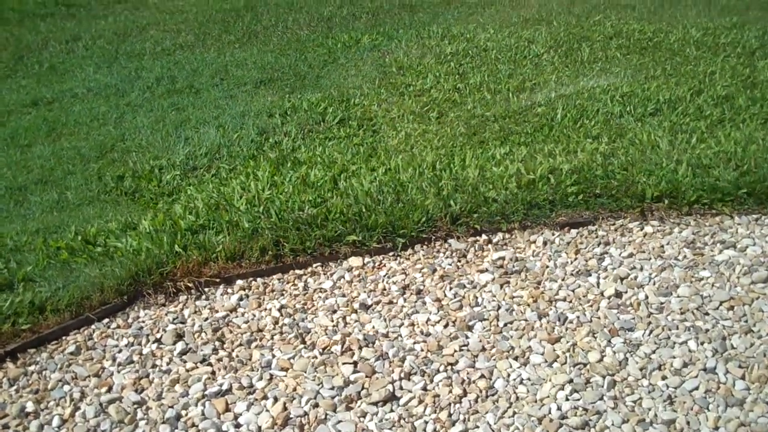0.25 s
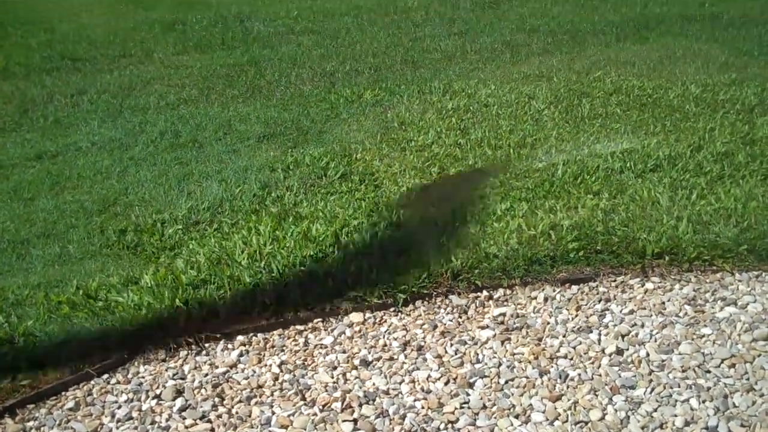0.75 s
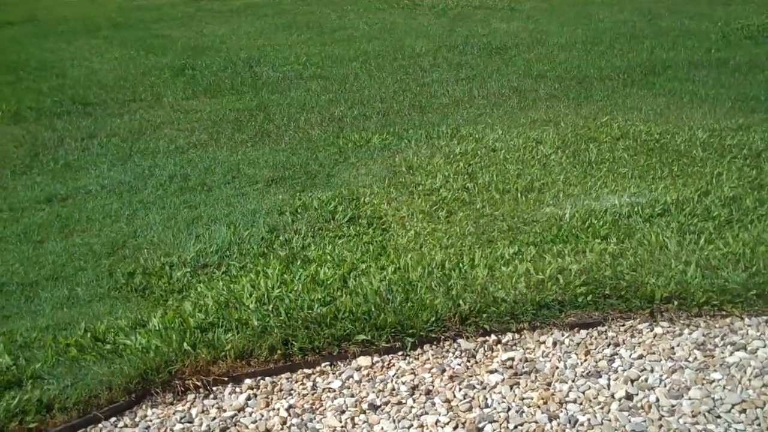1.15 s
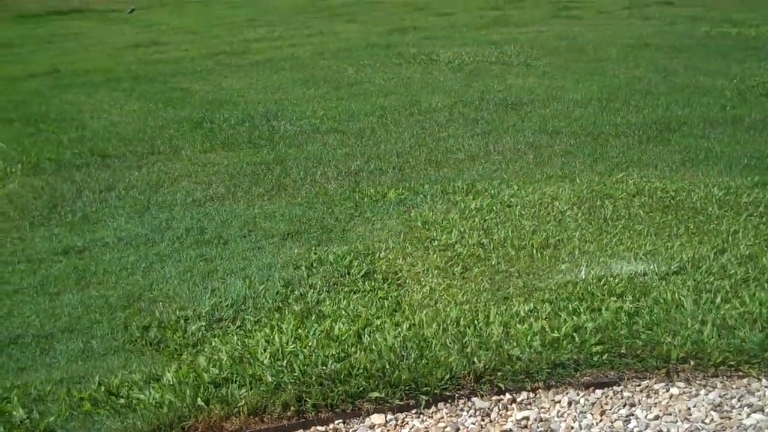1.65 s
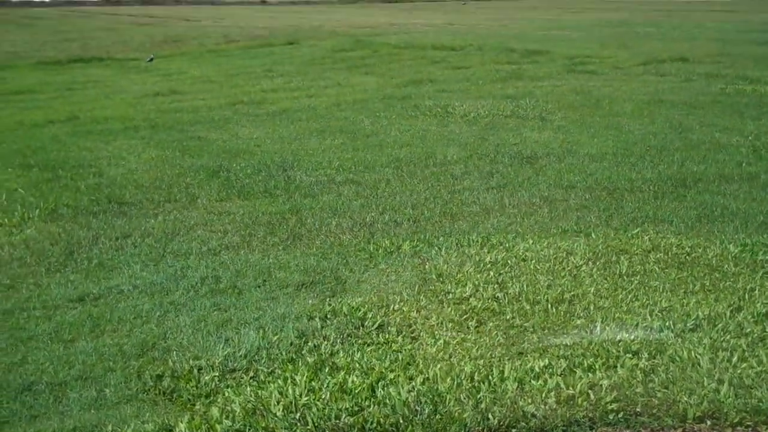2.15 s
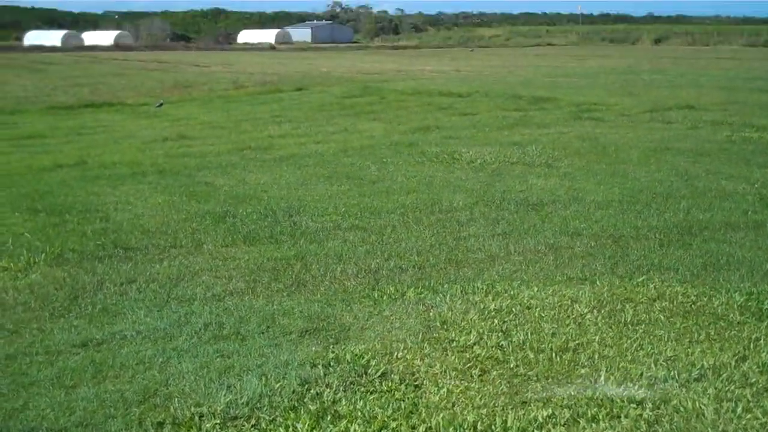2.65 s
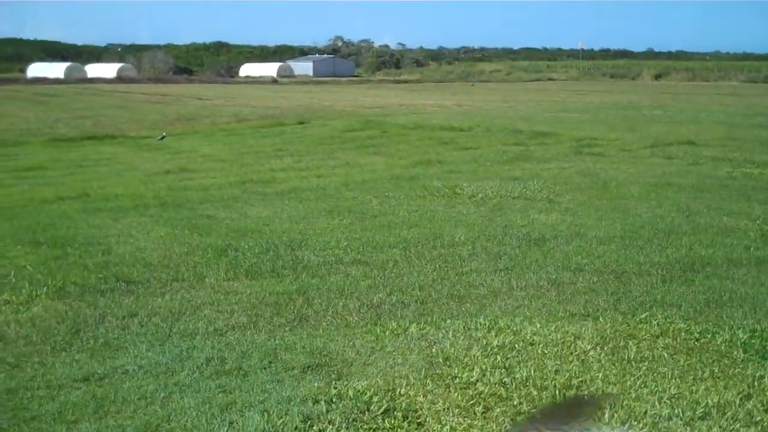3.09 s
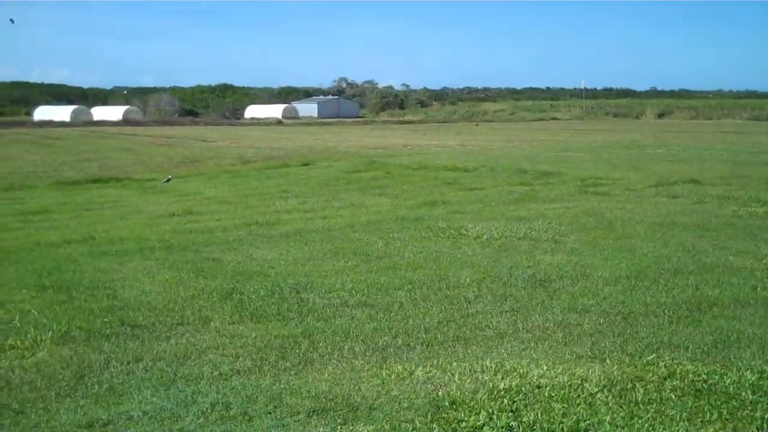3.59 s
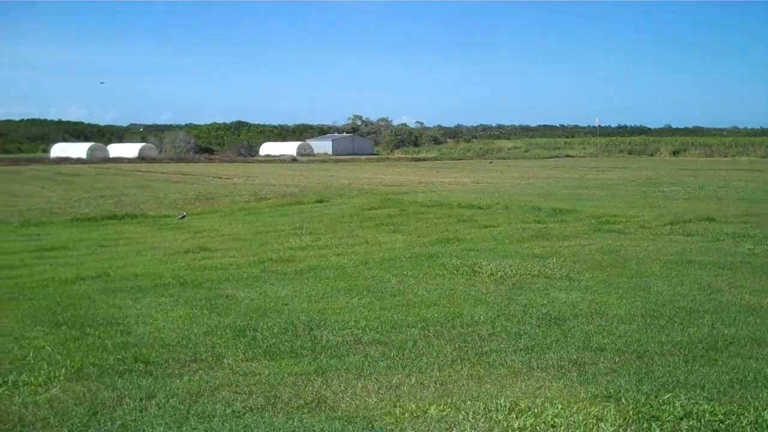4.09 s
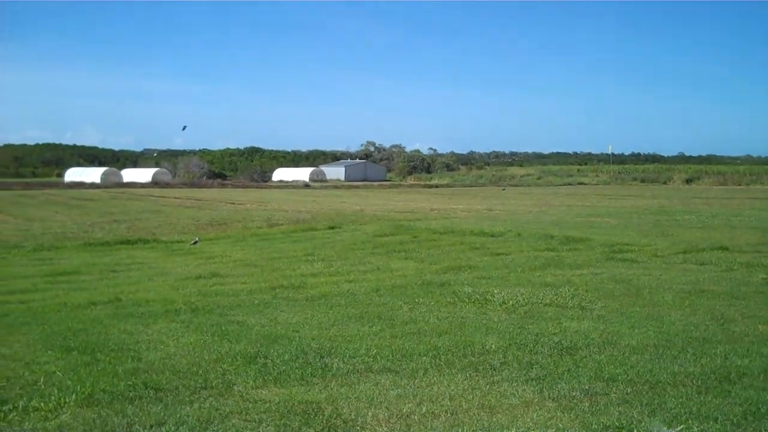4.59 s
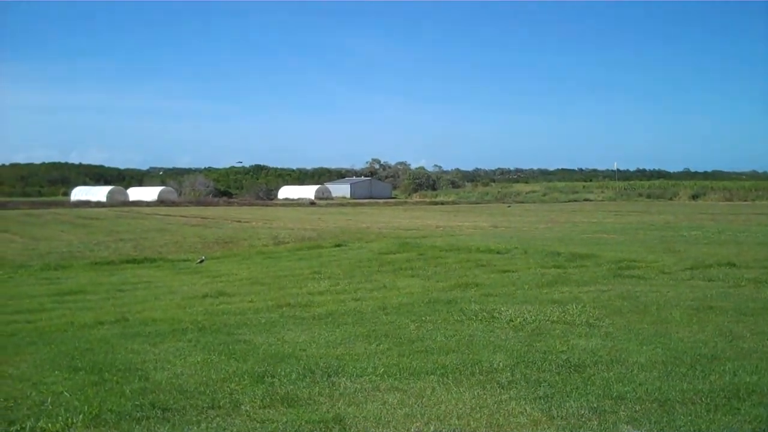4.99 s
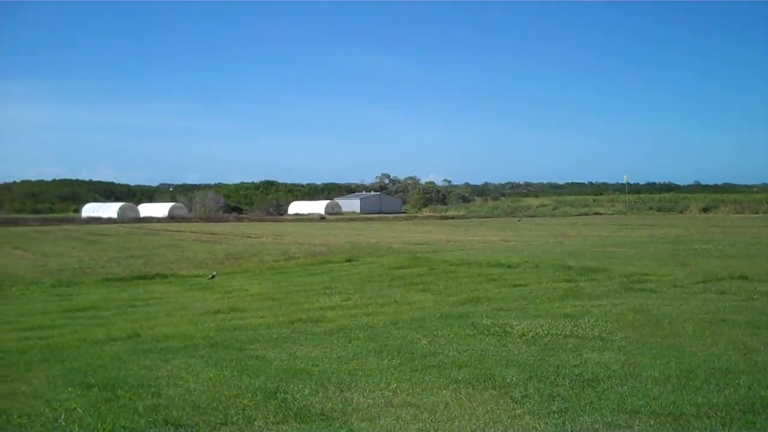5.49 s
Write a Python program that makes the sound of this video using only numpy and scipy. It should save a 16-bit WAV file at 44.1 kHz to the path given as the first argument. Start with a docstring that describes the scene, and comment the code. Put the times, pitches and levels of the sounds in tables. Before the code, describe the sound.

A light piston helicopter flies low over a grassy airfield. It approaches with a loud, low engine drone, a buzzing tail rotor and a soft throb and thin swish from the main blades. As it turns side-on, the exhaust rasp surges about three times a second. It then heads away with more rasp and rushing air, its pitch slowly sinking. A small stereo camera microphone hears it from the ground.

```python
"""A light piston helicopter flies low over an airfield, heard by a small stereo camera in the grass.
It comes in on a six-cylinder exhaust drone and rasp, with a fan note and a buzzing tail rotor; each
main blade makes the drone throb and ends in a thin swish. Just after 1 s the level dips briefly.
From 2 s it turns side-on: the rasp surges about three times a second and the drone gives way each time.
After 4 s it heads away with more rasp and rushing air, its pitch still slowly sinking."""
import sys
import numpy as np
from scipy.fft import rfft, irfft, next_fast_len
from scipy.io import wavfile
from scipy.ndimage import uniform_filter1d, map_coordinates

SR = 44100
rng = np.random.default_rng(int(sys.argv[2]) if len(sys.argv) > 2 else 0)


def inscribe(sig):
    """Save sig as 16-bit PCM at rate SR to the path in sys.argv[1].

    A 1-D sig is mono; a 2-D sig holds one channel per row.
    Samples are clipped to [-1, 1] before scaling.
    """
    pcm = np.round(np.clip(np.atleast_2d(sig).T, -1, 1) * 32767)
    wavfile.write(sys.argv[1], SR, pcm.astype(np.int16))


N = 253134
COMING, SIDE_ON, GOING = VIEWS = (0, 1, 2)  # how the craft faces the listener


# The body of the drone, thinning as the craft swings round: t/s, firing level/dB, octave level/dB
DRONE_FADERS = [(0, -10, -38.5), (2.15, -10, -31), (2.6, -12, -23.5), (3.05, -12, -22.5),
                (3.55, -14, -27.5), (3.9, -22.5, -31.5), (4.15, -32, -30), (4.55, -20.5, -21.5),
                (4.9, -25.5, -30), (5.2, -17.5, -29), (5.74, -15.5, -32)]
# Lesser engine tones: multiple of crank rate, coming level/dB, side-on level/dB, going level/dB
ENGINE_PARTIALS = [(1, -43, -36.5, -30), (2, -34.5, -31, -43.5), (2.5, -43, -49, -30),
                   (3.5, -50.5, -36, -26.5), (4, -38, -36, -53.5), (4.5, -45, -38, -24),
                   (5, -35.5, -50, -37.5), (5.5, -49.5, -52.5, -42), (6.5, -46.5, -44.5, -43),
                   (7, -36.5, -39.5, -29.5), (7.5, -55.5, -42, -36.5), (8, -52.5, -40, -46),
                   (8.5, -39.5, -55, -35), (9, -44, -40, -29), (10, -46.5, -59, -52),
                   (11.5, -51, -45.5, -43.5), (12, -53.5, -58, -48.5), (12.5, -52.5, -57.5, -51.5)]

def exhaust_drone(turns, blade, view, throb, surge_db):
    """Three firings a turn make the drone; unequal cylinders add half-orders around it."""
    firing_db, octave_db = curves(DRONE_FADERS)
    firing_db = firing_db - 0.44 * surge_db  # ducks under each surge
    firing = amp(firing_db) * tone(3 * turns, flutter_db=0.82, drift=0.086, rate=12)
    octave = amp(octave_db) * tone(6 * turns, flutter_db=2.5, drift=0.19, rate=11)
    lesser = 0
    for order, *levels in ENGINE_PARTIALS:
        gain = amp(np.interp(view, VIEWS, levels) - 1)
        lesser += gain * tone(order * turns, flutter_db=2, drift=0.28, rate=3.976)
    # each blade pushes its downwash over the pipe
    return firing * tremolo(blade, throb, at=.5) + (octave + lesser) * tremolo(blade, throb / 2, at=.3)


def exhaust_buzz(turns, view):
    """The engine cycle repeats every two turns: two wavetables of it, blended by the sound path."""
    harmonic = np.arange(4097)
    in_range = (harmonic > 19) & (harmonic < 150)
    strength = in_range * np.where(harmonic % 2, .6, 1)  # half-orders are the weaker ones
    partials = rng.standard_normal((2, 4097, 2)) @ [1, 1j]
    waves = irfft(partials * strength)
    first, second = [np.interp(turns / 2 % 1, np.linspace(0, 1, len(wave)), wave) for wave in waves]
    path = view + 0.66 * wobble(2.998)
    return np.cos(path) * first + np.sin(path) * second


# EQ of the rasp: f/Hz, coming level/dB, side-on level/dB, going level/dB
RASP_EQ = [(90, -27.5, -23.5, -21.5), (164, 3, -2.5, -0.5), (230, -2.5, -0.5, 0.5), (304, -4, 0, -3),
           (370, -7.5, -4.5, -5.5), (470, -14, -10.5, -10.5), (551, -11.5, -11.5, -12),
           (710, -16, -13, -13), (900, -21.5, -19, -19), (1100, -23.5, -20.5, -20),
           (1390, -28.5, -27.5, -26.5), (1800, -37, -33.5, -32.5), (2190, -46, -43, -47),
           (7000, -73.5, -73, -68)]

def exhaust_rasp(turns, blade, view, level_db):
    """Puffs of gas at each firing over the pitched buzz, crossfaded between the three views."""
    buzz = exhaust_buzz(turns, view)
    rasp = 0
    for facing in VIEWS:
        eq = [(hz, levels[facing]) for hz, *levels in RASP_EQ]
        share = np.clip(1 - np.abs(view - facing), 0, 1)
        puffs = noise(eq) * tremolo(3 * turns, .2, at=0)
        pitched = filtered(buzz, lambda hz: colour(eq, hz))
        rasp += amp(-2.5) * np.sqrt(share) * puffs / midrange_rms(puffs)
        rasp += amp(-3.5) * share * pitched / midrange_rms(pitched)
    # the harder the rasp, the sharper its edge; duller from behind
    edge_eq = [(1200, -27.5), (1850, 4.5), (2800, 4.5), (5000, -16.5)]
    edge = filtered(rasp, lambda hz: amp(along(edge_eq, hz)))
    edge_db = np.interp(level_db, [-35, -29.5], [-18, -2]) + np.interp(view, [SIDE_ON, GOING], [0, -8])
    chop = tremolo(blade, 0.073, at=0.44) * tremolo(2 * blade, 0.048, at=0.15)
    return amp(level_db) * (rasp + amp(edge_db) * edge) * chop


# Swells during the turn: crest t/s, half-length/s, boost/dB
RASP_SWELLS = [(2.104, .06, 2.5), (2.424, 0.11, 5), (2.764, .09, 5.5), (3.055, .06, 6), (3.36, 0.051, 6),
               (3.647, .07, 2), (3.897, 0.045, 4.5), (4.156, .08, 2.5), (4.579, .12, 3.5)]

def rasp_surges():
    """The rasp's boost in dB as the craft turns: bell-shaped swells, slightly flat on top."""
    t = np.arange(N) / SR
    return sum(db * np.exp(-np.abs((t - crest) / length) ** 2.1) for crest, length, db in RASP_SWELLS)


# The growl's send, riding on the rasp fader: t/s, relative level/dB
GROWL_SEND = [(0, -4), (1.6, -15.5), (2.15, 0.5), (2.8, 1), (3.4, 2.5), (3.55, -14), (5.74, -16)]

def side_growl(turns, rasp_db):
    """Side-on, the firing's third harmonic stands out, bending up into each surge and down out of it."""
    bend = 0.14 * uniform_filter1d(rasp_db, size=4096)
    level_db = rasp_db + curves(GROWL_SEND)[0]
    return amp(level_db) * tone(9 * turns + bend, flutter_db=0.5, drift=0.25, rate=16)


# Harmonics of the main rotor's thump: multiple of blade rate, level/dB
THUMP_PARTIALS = [(1, -46.5), (2, -31), (3, -38), (4, -31.5), (5, -36), (6, -31.5), (7, -39), (8, -31.5),
                  (9, -44.5)]
# Harmonics of the tail rotor's buzz: multiple of tail blade rate, level/dB
TAIL_PARTIALS = [(1, -31.5), (2, -35), (3, -40), (4, -50.5), (5, -41.5), (6, -55.5)]
# EQ of the downwash rumble: f/Hz, level/dB
WASH_EQ = [(12, -22), (25, -9), (45, -6), (75, 0), (110, -2.5), (170, 4), (230, -12.5), (400, -25.5),
           (900, -60.5)]

def rotors(turns, blade, view, tail_blades_per_turn=1.785):
    """Each main blade sends one low thump; the tail rotor buzzes; their wash rumbles in time."""
    # the thump's harmonics crest together behind the craft and smear elsewhere
    smear = np.interp(view, [SIDE_ON, GOING], [1.3, .6])
    thump = np.sqrt(2) * sum(amp(db) * np.sin(2 * np.pi * k * (blade - .48) + smear * wobble(1.2))
                             for k, db in THUMP_PARTIALS)
    tail = sum(amp(db) * tone(k * tail_blades_per_turn * turns, flutter_db=0, drift=0.14, rate=4.1)
               for k, db in TAIL_PARTIALS)
    wash = noise(WASH_EQ) * tremolo(blade, np.interp(view, [COMING, GOING], [.2, .6]), at=0.51)
    facings = [COMING, SIDE_ON, 1.4, GOING]
    thump_db = np.interp(view, facings, [0, -3.5, -7.5, 1.5])
    tail_db = np.interp(view, facings, [-3, 1, -6, -2.5])
    wash_db = np.interp(view, facings, [-28, -27, -29.5, -21.5])
    return amp(thump_db) * thump + amp(tail_db) * tail + amp(wash_db) * wash


def cooling_fan(turns, view, rasp_db, cycles_per_turn=8.55):
    """The fan's note carries forward and fades as the craft turns away."""
    cycles = cycles_per_turn * turns
    note = tone(cycles, flutter_db=1.5, drift=.1, rate=6)
    octave = amp(-15) * tone(2 * cycles, flutter_db=5, drift=0.22, rate=6.7)
    return amp(rasp_db + np.interp(view, VIEWS, [2.5, -12, -25])) * (note + octave)


# EQ of the blade hiss from the front and side: f/Hz, level/dB
AIR_FRONT_EQ = [(700, -21.5), (2000, -1), (3000, 1), (4000, 0.5), (5200, -4), (6300, 2), (7200, -2),
                (8200, 0.5), (9200, -7.5), (10500, -15), (12000, -20), (14000, -23.5)]
# EQ of the blade hiss from behind: f/Hz, level/dB
AIR_REAR_EQ = [(700, -30), (2000, 3.5), (3000, 0), (4000, 0), (5200, -3.5), (6300, 1), (7200, 1), (8200, 4),
               (9200, -10), (10500, -16), (12000, -24), (14000, -27)]

def rushing_air(blade, view, level_db):
    """Turbulence hisses off the blades, changing colour and pulsing deeper from behind."""
    behind = np.clip(view - SIDE_ON, 0, 1)
    hiss = np.sqrt(1 - behind) * noise(AIR_FRONT_EQ) + np.sqrt(behind) * noise(AIR_REAR_EQ)
    return amp(level_db + 1.4) * hiss * tremolo(blade, 0.074 + 0.069 * behind, at=0.23)


def tip_swish(blade, centre_hz, level_db, glide=0.24, width=.14):
    """The advancing tip sheds a hiss whose pitch falls as it sweeps past; no two passes are alike."""
    sweep = (blade + .44) % 1 - .5
    pitch_hz = centre_hz * (1 - glide * sweep + 0.011 * wobble(19))
    carrier = np.exp(2j * np.pi * np.cumsum(pitch_hz) / SR)
    # low-passed noise, shifted up to ride the pitch
    real, imag = filtered(rng.standard_normal((2, 2, N)), lambda hz: 1 / (1 + (hz / 800) ** 2))
    hiss = ((real + 1j * imag) * carrier).real
    envelope = np.exp(-.5 * (sweep / width) ** 2)
    return amp(level_db - 2.3 + 1.3 * wobble(27)) * unit(hiss * envelope)


# Faint whistles in the hiss: crest t/s, half-length/s, f/Hz, level/dB
WHISTLE_CUES = [(0.618, 0.05, 3970, -63.5), (1.08, 0.053, 2931, -62.5)]

def whistles():
    """Two thin tones swell and fade."""
    t = np.arange(N) / SR
    mix = 0
    for crest, length, hz, db in WHISTLE_CUES:
        envelope = np.exp(-.5 * ((t - crest) / length) ** 2)
        mix += amp(db) * envelope * tone(hz * t, flutter_db=1, drift=.5, rate=30)
    return mix


def level_dip(start_s=1.14, depth_db=3, fall_s=.015, hold_s=0.31, release_s=.38):
    """Gain for the whole mix: it drops abruptly once, stays low and creeps back."""
    corners = start_s + np.cumsum([0, fall_s, hold_s, release_s])
    return amp(-depth_db * np.interp(np.arange(N) / SR, corners, [0, 1, 1, 0]))


# Steady narrow resonances that colour the rasp, wash and hiss: f/Hz, width/Hz, boost/dB
STEADY_PEAKS = [(380, 26, 3), (898, 58, 5), (1055, 47, 3), (1925, 120, 4), (2330, 29, 0.5), (3000, 26, 4)]

def colour(eq, hz):
    """Gain of a broad EQ curve with steady ringing peaks on top."""
    peaks_db = sum(db / (1 + (2 * (hz - centre) / width) ** 2) for centre, width, db in STEADY_PEAKS)
    return amp(along(eq, hz) + peaks_db)


# Stereo image at the two microphone ports: f/Hz, left-right correlation
PORT_CORRELATION = [(300, .995), (600, .96), (1100, .9), (2000, .4), (4000, 0), (8000, -.05), (12000, .1)]

def noise(eq):
    """Coloured stereo noise with a mid of rms 1, near mono in the bass and wide in the treble."""
    def mid_side_gains(hz):
        spread = np.arccos(np.clip(along(PORT_CORRELATION, hz), -1, 1)) / 2
        return colour(eq, hz) * [np.cos(spread), np.sin(spread)]
    mid, side = filtered(rng.standard_normal((2, N)), mid_side_gains)
    return np.array([mid + side, mid - side]) / np.std(mid)


def tone(cycles, flutter_db, drift, rate):
    """A partial of rms near 1 whose level and phase (drift, in radians) waver in the turbulent air."""
    phase = 2 * np.pi * (cycles + rng.random()) + drift * wobble(rate)
    return np.sqrt(2) * amp(flutter_db * wobble(rate)) * np.sin(phase)


def tremolo(cycles, depth, at):
    """A gain of rms 1 that swells once a cycle, at the given part of the cycle."""
    return (1 + depth * np.cos(2 * np.pi * (cycles - at))) / np.sqrt(1 + depth ** 2 / 2)


def wobble(rate):
    """A smooth random modulator, rate knots a second."""
    coarse = np.arange(0, N + 64, 64)
    knots = rng.standard_normal(1024)
    return np.interp(np.arange(N), coarse, map_coordinates(knots, [coarse * rate / SR], mode="mirror"))


def filtered(x, response):
    """x through a frequency response."""
    size = next_fast_len(N + 8192)
    return irfft(rfft(x, size) * response(np.fft.rfftfreq(size, 1 / SR)), size)[..., :N]


def midrange_rms(x):
    """Strength of the mono mix between 500 and 2000 Hz."""
    mono = np.atleast_2d(x).mean(axis=0)
    return np.std(filtered(mono, lambda hz: (hz > 500) & (hz < 2000)))


def curves(rows):
    """One automation lane for each column after the time."""
    times, *columns = np.transpose(rows)
    return [np.interp(np.arange(N) / SR, times, column) for column in columns]


def along(points, hz):
    """Read (f/Hz, value) points on a log frequency axis."""
    freqs, values = np.transpose(points)
    return np.interp(np.log(hz + 1), np.log(freqs + 1), values)


def amp(db):
    return 10 ** (np.asarray(db) / 20)


def unit(x):
    return x / np.sqrt(np.mean(x ** 2) + 1e-20)


# The sinking pitch, as the crankshaft rate heard from the ground: t/s, f/Hz
CRANK_RATE = [(0, 45.7), (0.6, 45), (1.2, 45.027), (1.8, 44.578), (2.2, 43), (2.6, 43.6), (3, 42.5),
              (3.5, 41.8), (4, 40.538), (4.5, 40.6), (5, 39.4), (5.74, 38)]
# The flyover: t/s, view (0 coming, 1 side-on, 2 going), throb depth, swish f/Hz, swish level/dB
FLIGHT_PATH = [(0, 0.35, 0, 9780, -59.5), (1.1, 0, 0.14, 9700, -56.5), (1.3, 0.23, 0.05, 9620, -58.5),
               (1.9, 0.22, 0.01, 9700, -56.5), (2.5, 1.2, 0.28, 9580, -59), (3.6, 1.04, 0.49, 9310, -64),
               (4.3, 2, 0.4, 8910, -53), (5.74, 2, 0.3, 8550, -52.5)]
# The noisy layers, weakest side-on and strongest from behind: t/s, rasp level/dB, air level/dB
NOISE_FADERS = [(0, -34, -53.5), (2, -33.5, -53.5), (3.2, -36, -54.5), (3.8, -37, -56), (4.3, -30.5, -48),
                (5.74, -31, -46.5)]

def scene():
    """One shaft drives engine, rotors and fan; each surge lifts rasp and air and ducks the drone."""
    turns = np.cumsum(curves(CRANK_RATE)[0]) / SR
    blade = .30153 * turns - .84  # main blade passes, geared down from the crank
    view, throb, swish_hz, swish_db = curves(FLIGHT_PATH)
    surge_db = rasp_surges()
    rasp_db, air_db = curves(NOISE_FADERS)
    rasp_db += surge_db
    air_db += np.interp(view, [SIDE_ON, GOING], [0.5, 1.2]) * surge_db
    exhaust = (exhaust_drone(turns, blade, view, throb, surge_db)
               + exhaust_rasp(turns, blade, view, rasp_db)
               + side_growl(turns, rasp_db))
    blades = (rotors(turns, blade, view)
              + rushing_air(blade, view, air_db)
              + tip_swish(blade, swish_hz, swish_db))
    return level_dip() * (exhaust + cooling_fan(turns, view, rasp_db) + blades + whistles())


# Pan across the spectrum: f/Hz, left minus right level/dB
PORT_BALANCE = [(25, -8.5), (60, -4.6), (100, -3.1), (170, -2.9), (260, -1.3), (1000, -1), (2000, -.3),
                (3200, -3), (4600, -2), (6200, -4), (7200, 3), (8200, 11), (10000, 9), (13000, 8)]
# How far the left port leads: f/Hz, phase/rad
PORT_LEAD = [(50, .6), (130, .43), (250, .29), (500, .13), (1000, .05), (3000, 0)]

def record(dry, top_hz=14200):
    """The left port is thinner and slightly ahead in the bass, and rings in the treble; the top is cut."""
    def ports(hz):
        gains = amp(np.outer([.5, -.5], along(PORT_BALANCE, hz)))
        lead = np.exp(1j * np.outer([.5, -.5], along(PORT_LEAD, hz)))
        return lead * gains / np.sqrt(np.mean(gains ** 2, axis=0))
    heard = filtered(dry, ports)
    soft_clipped = heard / (1 + np.abs(heard / .98) ** 12) ** (1 / 12)
    return filtered(soft_clipped, lambda hz: hz < top_hz)


dry = scene()
out = record(dry)
inscribe(out)
```